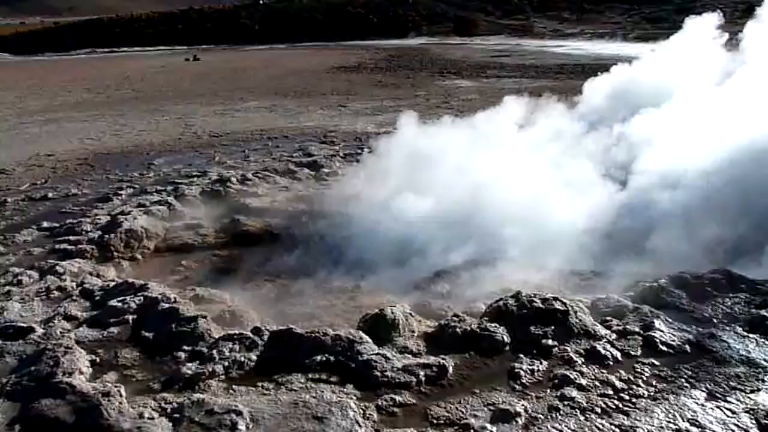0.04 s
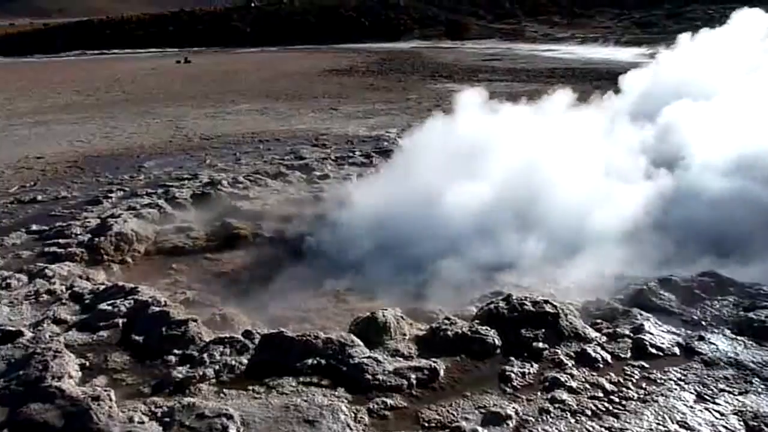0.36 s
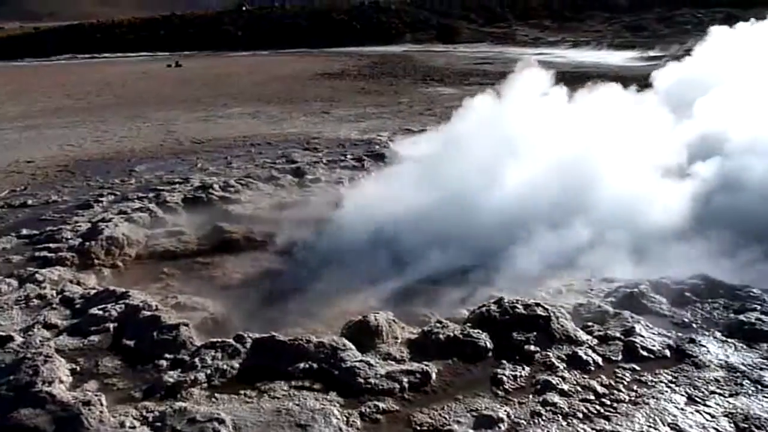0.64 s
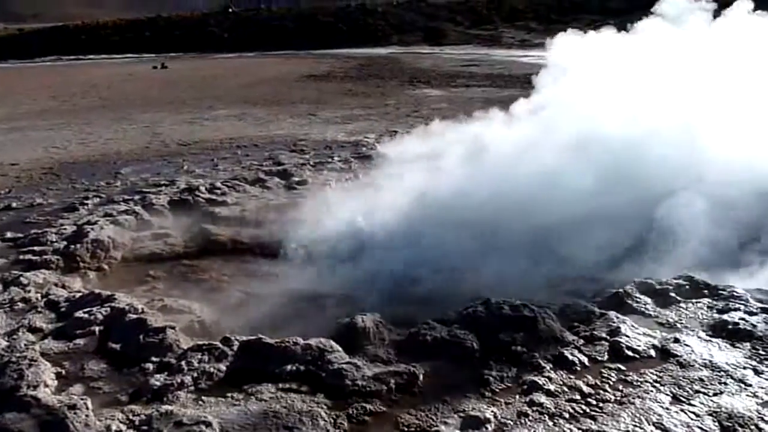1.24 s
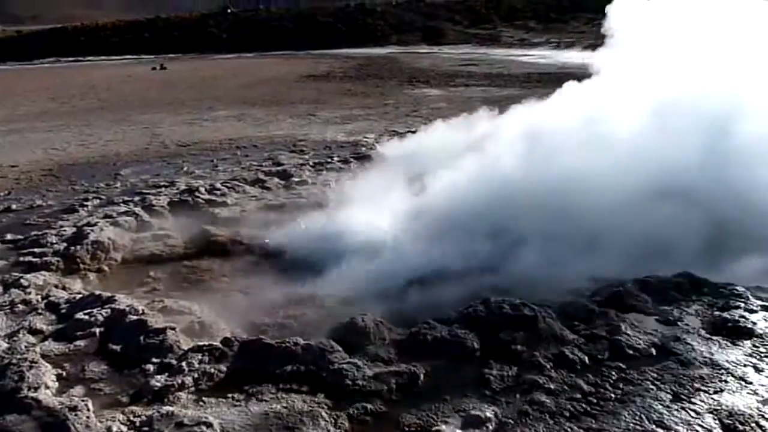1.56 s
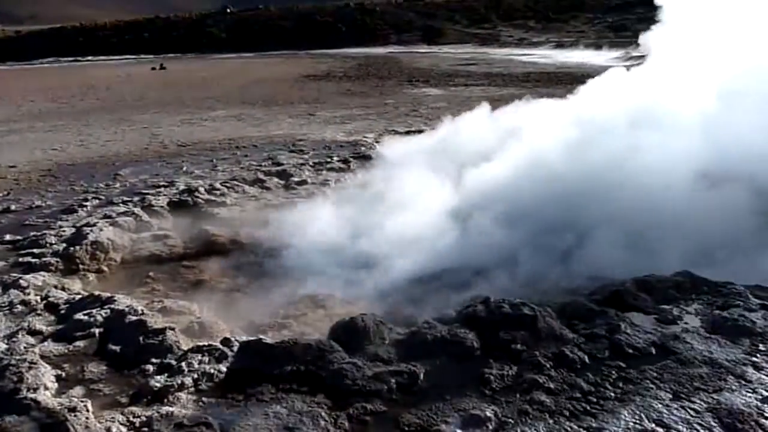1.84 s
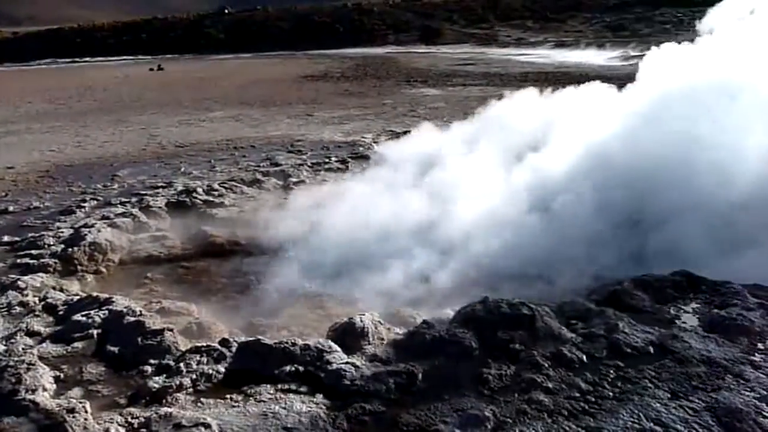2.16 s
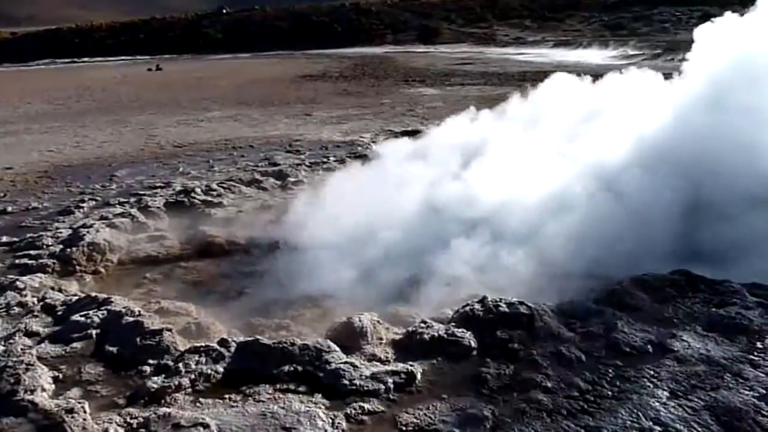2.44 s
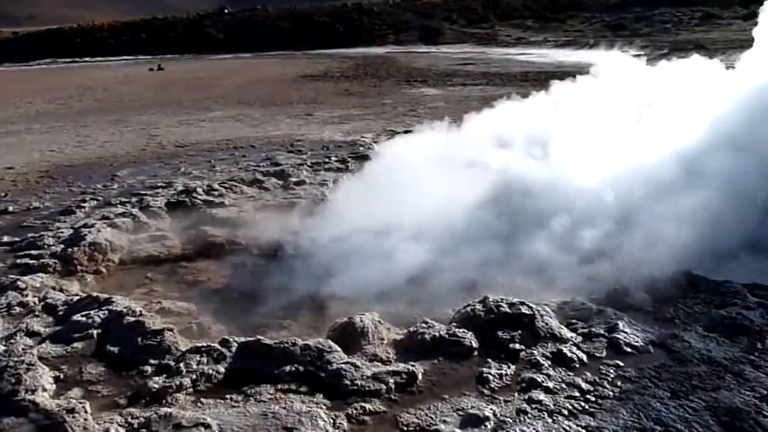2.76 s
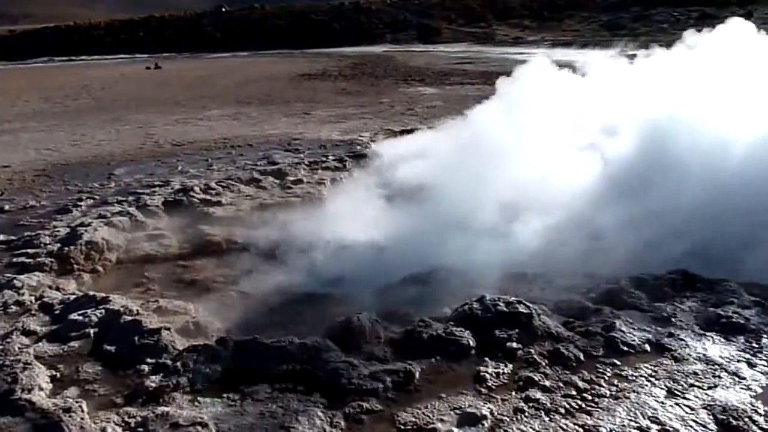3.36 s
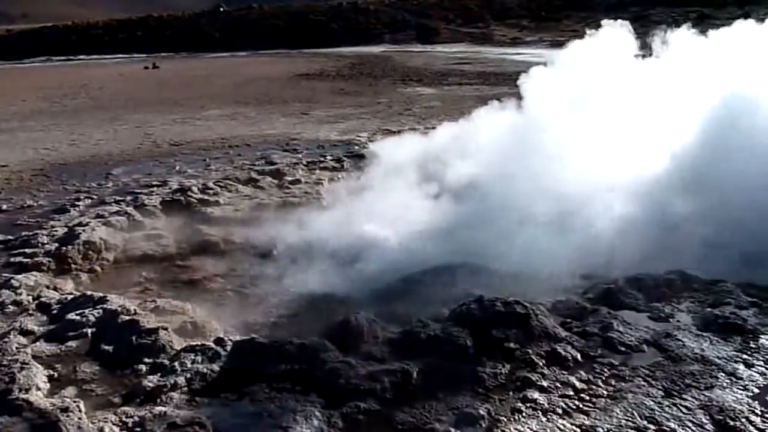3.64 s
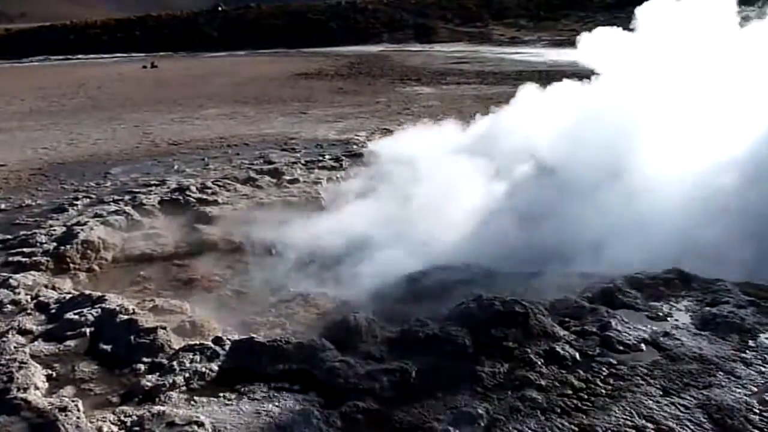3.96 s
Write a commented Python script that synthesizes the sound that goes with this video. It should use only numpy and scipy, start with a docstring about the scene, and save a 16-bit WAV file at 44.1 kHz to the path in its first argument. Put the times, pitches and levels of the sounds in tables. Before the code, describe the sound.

Hot spring water churns and bubbles outdoors, thudding and spattering over a low rumble.

```python
"""A deep, glugging rumble and a dense churn: a geyser pool boiling hard in the open air, a few metres away.
Big steam pockets wobble under the water and collapse with thuds, while smaller ones burst at the surface.
Thrown water slaps back down and patters as spray. The pool surges twice, over a faint even hiss."""
import sys
import numpy as np
from scipy import signal
from scipy.fft import rfft, irfft
from scipy.io import wavfile

SR = 44100
rng = np.random.default_rng(int(sys.argv[2]) if len(sys.argv) > 2 else 0)


def file_out(sig):
    """Save sig as 16-bit WAV at sys.argv[1]."""
    # one column per channel
    cols = np.atleast_2d(sig).T
    # limit, then scale
    lim = np.clip(cols, -1, 1)
    pcm = np.round(lim * 32767).astype(np.int16)
    wavfile.write(sys.argv[1], SR, pcm)


N = 176400

# Boiling deep in the vent, before its trim: time_s, level_db
BOIL_LEVELS = [(0.11, -42), (0.22, -38.5), (0.31, -36), (0.36, -38), (1.15, -39), (1.19, -31.5),
               (1.38, -38), (1.47, -30.5), (1.52, -41), (1.71, -32), (1.89, -45), (1.91, -36), (2.18, -40),
               (2.21, -46), (2.34, -33), (2.43, -51.5), (2.68, -44.5), (2.72, -38.5), (2.79, -45.5),
               (2.84, -35.5), (3.08, -45.5), (3.13, -39.5), (3.15, -44), (3.37, -41), (3.39, -46),
               (3.59, -37), (3.64, -50.5), (3.87, -37.5), (3.91, -53), (4.0, -38.5)]
# Vigour at the surface, before trims and sputter: time_s, churn_db, spray_db
SURGE_LEVELS = [(0.11, -46.5, -64), (0.13, -45, -57.5), (0.3, -48.5, -61), (0.34, -42, -51),
                (0.42, -43.5, -61), (0.56, -44.5, -57), (0.69, -47, -61.5), (1.05, -42.5, -53),
                (1.15, -51, -67), (1.23, -40, -56.5), (1.51, -39, -53.5), (1.71, -33.5, -42),
                (1.85, -45, -56), (1.97, -43, -59), (1.99, -46.5, -60), (2.1, -40.5, -53), (2.14, -42, -57),
                (2.86, -50.5, -64), (2.97, -45.5, -64), (3.01, -49.5, -65), (3.31, -45, -57.5),
                (3.35, -51.5, -60.5), (3.49, -46, -63), (3.62, -49, -63.5), (3.85, -37.5, -53),
                (3.87, -38.5, -52), (3.89, -39.5, -53), (4.0, -44.5, -59)]
BOIL_TRIM_DB, CHURN_TRIM_DB, SPRAY_TRIM_DB = -3, -.5, -3

# Tone colour of each layer, as an EQ curve: frequency_hz, relative_db
BOIL_EQ = [(15, -22), (35, -8.5), (55, -5), (85, -0.5), (130, -1), (200, -3), (300, -13), (500, -32.5),
           (1000, -57.5)]
CHURN_EQ = [(100, -12.5), (200, -3), (310, -0.5), (500, -3.5), (900, -7), (1250, -12.5), (1600, -21.5),
            (2500, -30.5), (5000, -63)]
SPRAY_EQ = [(800, -14.5), (1550, -7), (1950, -1.5), (2500, -4), (3000, -6), (3600, -15), (4400, -25),
            (6000, -39.5), (8000, -58.5)]
HISS_EQ = [(300, -10), (2000, -1.5), (4000, 0.5), (6000, 0.5), (7200, -1.5), (8300, -7.5), (9000, -16.5),
           (9800, -32)]

# Large steam pockets collapsing: time_s, peak_db, pitch_hz
THUD_HITS = [(.429, -30.5, 260), (1.534, -22, 307), (1.567, -26, 347), (1.675, -38, 300),
             (1.691, -25.5, 466), (1.706, -41, 380), (2.097, -26.5, 284), (2.900, -41, 330),
             (2.979, -37, 406), (3.203, -45, 220), (3.425, -37, 297), (3.513, -32, 450), (3.560, -38, 240),
             (3.592, -33, 213), (3.762, -28.5, 384), (3.811, -30.5, 297), (3.862, -26, 380),
             (3.873, -28, 280)]
# Single bubbles ringing on: start_s, peak_db, start_pitch_hz
GLUG_HITS = [(.262, -34, 119), (.306, -34.5, 136), (0.461, -31.5, 907), (.578, -35, 646),
             (1.19, -31.5, 200), (1.261, -30.5, 223), (1.300, -33, 275), (1.405, -32, 264),
             (1.428, -29.5, 214), (1.462, -30.5, 240), (1.528, -31, 313), (2.062, -31.5, 730),
             (2.097, -37, 1500), (2.335, -33.5, 114), (2.412, -41, 530), (2.713, -44, 117),
             (2.825, -37, 171), (3.117, -40, 165), (3.513, -43, 1190), (3.764, -34.5, 333),
             (3.835, -36, 447)]
# Thrown water landing: start_s, bright_db, dull_db, decay_s
SPLASH_HITS = [(.102, -62.5, -41, 0.11), (0.329, -49, -47, 0.031), (.565, -59, -38, 0.063),
               (.733, -57, -39, 0.069), (.803, -51.5, -40, 0.027), (1.188, -59, -38, .05),
               (1.580, -45.5, -43, 0.067), (1.699, -45.5, -35, 0.053), (1.796, -42.5, -45.5, 0.056),
               (1.936, -48, -46, 0.044), (1.967, -49, -37, 0.054), (2.038, -63, -36.5, 0.033),
               (2.06, -54, -35, 0.078), (2.097, -52, -28.5, 0.034), (2.205, -54, -40, 0.058),
               (2.412, -57.5, -38, 0.051), (2.488, -61, -42, 0.02), (2.529, -54, -46, 0.029),
               (2.601, -58, -46.5, 0.013), (2.899, -55, -35.5, 0.021), (2.916, -48, -46, 0.044),
               (2.979, -69, -32.5, 0.033), (3.1462, -52, -36.5, .013), (3.281, -54, -42, .04),
               (3.315, -54, -52, 0.024), (3.419, -50, -43, 0.022), (3.479, -59, -35.5, 0.042),
               (3.513, -53, -38, 0.021), (3.698, -58, -49, 0.036), (3.8712, -35, -38, 0.014),
               (3.967, -50.5, -45, .04)]


def boil():
    """The low end: big steam pockets wobble under the water and merge into a rumble."""
    level_db, = automation(BOIL_LEVELS)
    pockets = bubbles(per_s=700, spread_db=2, cycles=7.3, low_hz=43.1, high_hz=350.6, sizes=16)
    rumble = equalise(pockets + noise(-13), BOIL_EQ)
    return from_db(BOIL_TRIM_DB + level_db) * unit_rms(rumble)


def churn(level_db):
    """The body: bubbles ring and burst at the surface in a wash of noise."""
    rings = bubbles(per_s=1600, spread_db=3, cycles=8.1, low_hz=185.6, high_hz=1582, sizes=24)
    bursts = unit_rms(clicks(per_s=700, spread_db=3.5))
    water = equalise(rings + from_db(9) * bursts + noise(7.5), CHURN_EQ)
    return from_db(CHURN_TRIM_DB + level_db) * unit_rms(water)


def thuds():
    """The punch: each collapsing steam pocket gives a heavily damped swing of pressure."""
    decay_cycles = 3.24
    out, t = np.zeros(N), np.arange(SR // 10) / SR
    for time_s, peak_db, hz in THUD_HITS:
        swing = np.sin(2 * np.pi * hz * t) * t * decay(t, decay_cycles / hz)
        start_s = time_s - .5 / hz  # half a cycle early, so the swing straddles its cue
        mix_in(out, start_s, from_db(peak_db) * swing / np.abs(swing).max())
    return out


def glugs():
    """A bubble swells, rings and rises in pitch as it nears the surface."""
    attack_cycles, decay_cycles, pitch_rise = .45, 20, .15  # 15 % up over the decay
    out, t = np.zeros(N), np.arange(SR // 2) / SR
    for start_s, peak_db, hz in GLUG_HITS:
        age_cycles = hz * t
        envelope = (1 - np.exp(-age_cycles / attack_cycles)) * decay(age_cycles, decay_cycles)
        phase = 2 * np.pi * age_cycles * (1 + .5 * pitch_rise * age_cycles / decay_cycles)
        mix_in(out, start_s, from_db(peak_db) * envelope / envelope.max() * np.sin(phase))
    return out


def splashes():
    """Water slaps down: a sharp crack and a dying spatter, in a bright layer and a dull one."""
    bright, dull, t = np.zeros(N), np.zeros(N), np.arange(SR // 5) / SR
    crack = 3.7 * (t == 0)  # the first impact stands above the spatter
    for start_s, bright_db, dull_db, decay_s in SPLASH_HITS:
        slap = crack + rng.standard_normal(len(t)) * decay(t, decay_s)
        mix_in(bright, start_s, from_db(bright_db) * slap)
        mix_in(dull, start_s, from_db(dull_db) * slap)
    return equalise(bright, SPRAY_EQ) + equalise(dull, CHURN_EQ)


def spray(level_db):
    """The top end: drops patter back on the pool and the crust, with a light fizz."""
    drops = unit_rms(clicks(per_s=2500, spread_db=1.5))
    fizz = bubbles(per_s=2000, spread_db=7, cycles=13, low_hz=1380, high_hz=4140, sizes=14)
    patter = equalise(drops + from_db(-10.5) * fizz + noise(-5), SPRAY_EQ)
    return from_db(SPRAY_TRIM_DB + level_db) * unit_rms(patter)


def hiss():
    """The bed: a faint, even hiss."""
    return equalise(noise(-66.5), HISS_EQ)


def bubbles(per_s, spread_db, cycles, low_hz, high_hz, sizes):
    """A swarm of bubbles of many sizes, each kicked once and ringing down 60 dB in `cycles`."""
    kicks = clicks(per_s, spread_db)
    size_of_kick = rng.integers(0, sizes, N)
    swarm = np.zeros(N)
    for size, hz in enumerate(np.geomspace(low_hz, high_hz, sizes)):
        radius, angle = from_db(-60 * hz / (cycles * SR)), 2 * np.pi * hz / SR
        resonance = [1, -2 * radius * np.cos(angle), radius ** 2]
        ring = signal.lfilter([1, 0, -1], resonance, kicks * (size_of_kick == size) + 1e-18)
        swarm += np.sqrt(hz) * unit_rms(ring)  # keeps the swarm's spectrum flat on average
    return unit_rms(swarm)


def clicks(per_s, spread_db):
    """Random impulses, many small and a few large."""
    heights = from_db(spread_db * np.minimum(rng.exponential(1, N), 3.5))
    polarity = rng.choice([-1, 1], N)
    return heights * polarity * (rng.random(N) < per_s / SR)


def noise(level_db):
    """White noise at an rms level."""
    return from_db(level_db) * rng.standard_normal(N)


def drift(rate_hz):
    """A smooth random wander with a spread of about 1."""
    hop, settle_steps = 40, 2000
    pole = np.exp(-2 * np.pi * rate_hz * hop / SR)
    steps = rng.standard_normal(N // hop + settle_steps + 2)
    slow = signal.lfilter([1], [1, -2 * pole, pole ** 2], steps)[settle_steps:]
    return np.interp(np.arange(N) / hop, np.arange(len(slow)), unit_rms(slow))


def equalise(x, eq):
    """Shape a flat sound with an EQ curve, keeping its power."""
    hz, db = np.transpose(eq)
    bin_hz = np.maximum(np.arange(N // 2 + 1) * SR / N, 1)
    gain = from_db(np.interp(np.log(bin_hz), np.log(hz), db))
    return irfft(rfft(x) * unit_rms(gain), N)


def automation(rows):
    """Each level column of a table, ramped from point to point."""
    time_s, *columns = np.transpose(rows)
    return [np.interp(np.arange(N) / SR, time_s, column) for column in columns]


def decay(t, t60):
    """Exponential tail, 60 dB down after t60."""
    return np.exp(-np.log(1000) * t / t60)


def mix_in(out, start_s, sound):
    """Drop a short sound onto a track."""
    i = int(start_s * SR)
    out[i:i + len(sound)] += sound[:N - i]


def from_db(db):
    """Decibels to gain."""
    return 10 ** (np.asarray(db) / 20)


def unit_rms(x):
    """Scale to an rms of 1."""
    return x / np.sqrt(np.mean(x ** 2) + 1e-20)


def scene():
    """The mono mix; churn and spray ride the same quick sputter of the vent."""
    churn_db, spray_db = automation(SURGE_LEVELS)
    sputter_db = 1.5 * drift(rate_hz=23)
    bed = hiss()
    pool = boil() + churn(churn_db + sputter_db) + spray(spray_db + sputter_db)
    return (pool + thuds() + glugs() + splashes() + bed)[None]


def record(dry):
    """A moment of silence, then a snap fade-in; a slight DC offset and a steep high cut."""
    start_s, fade_s, dc_offset, cutoff_hz = .096, .003, -.0056, 9800
    fade_in = np.clip((np.arange(N) / SR - start_s) / fade_s, 0, 1)
    high_cut = signal.ellip(10, .1, 80, cutoff_hz, fs=SR, output="sos")
    return signal.sosfilt(high_cut, (dry + dc_offset) * fade_in)


dry = scene()
out = record(dry)
file_out(out)
```